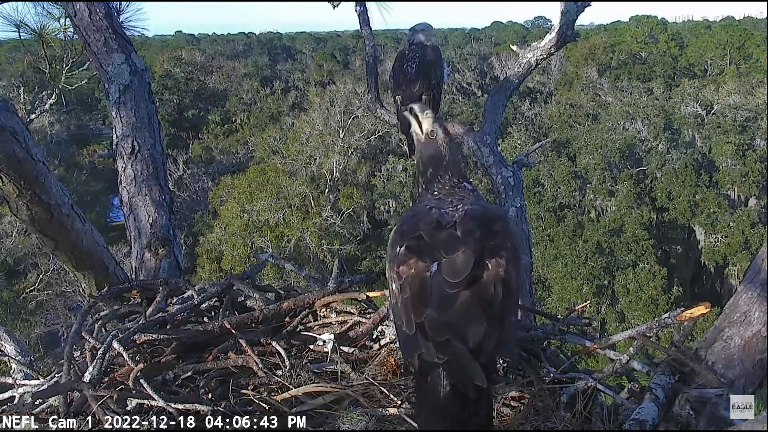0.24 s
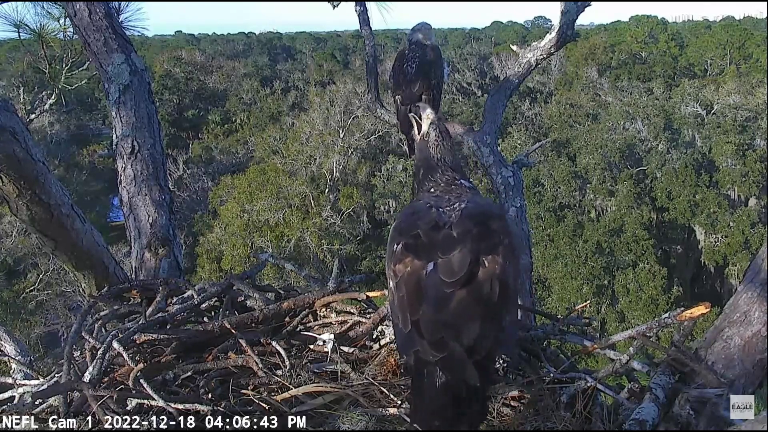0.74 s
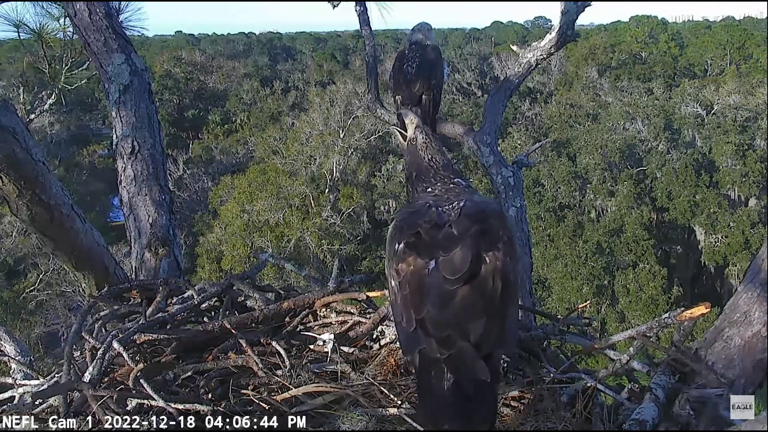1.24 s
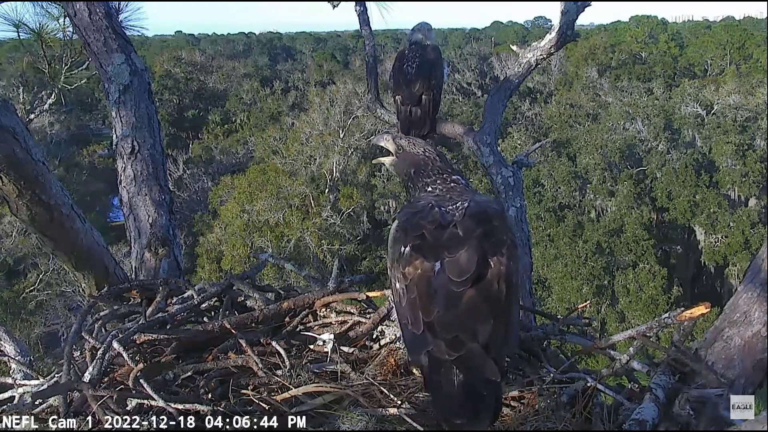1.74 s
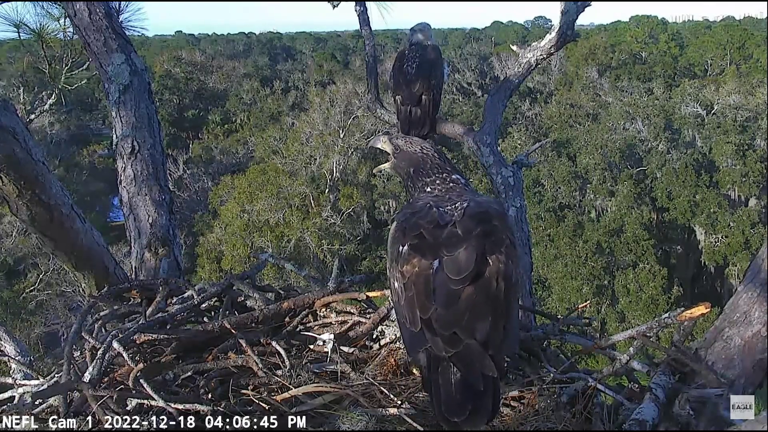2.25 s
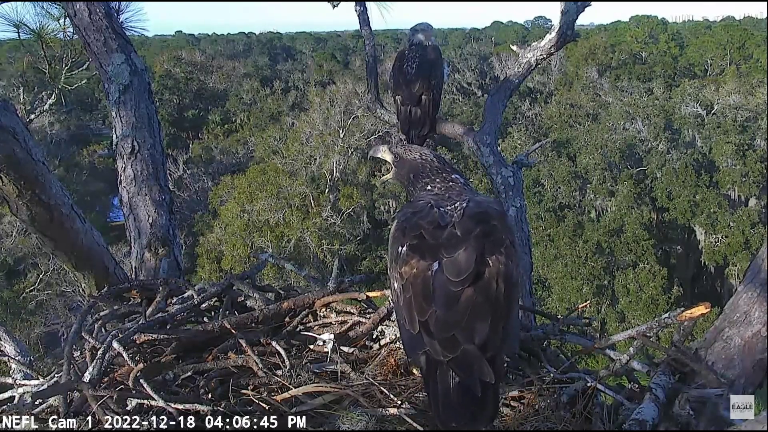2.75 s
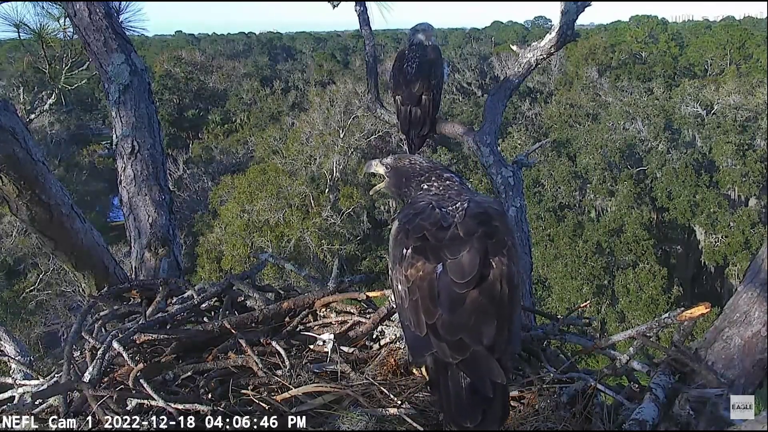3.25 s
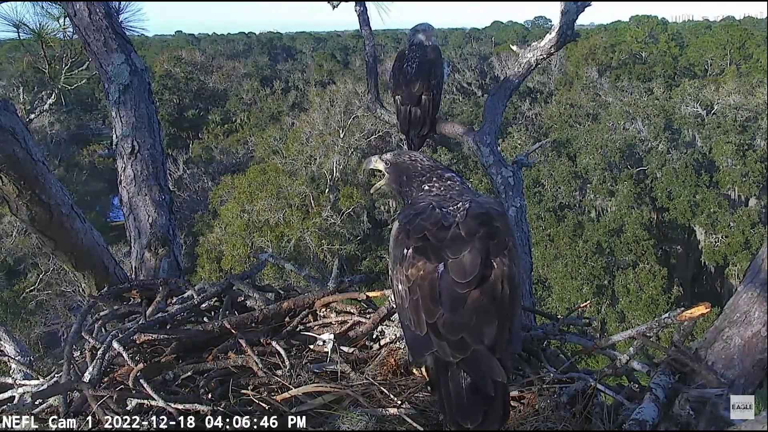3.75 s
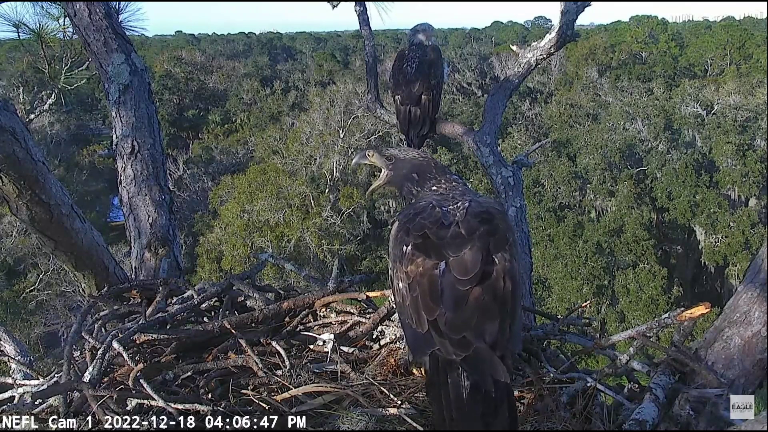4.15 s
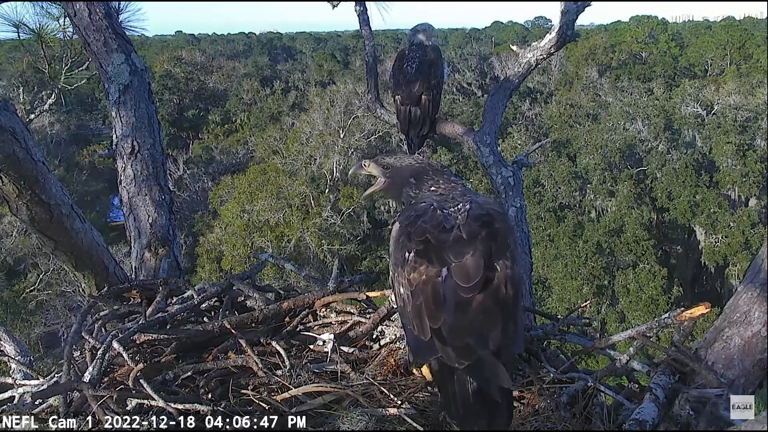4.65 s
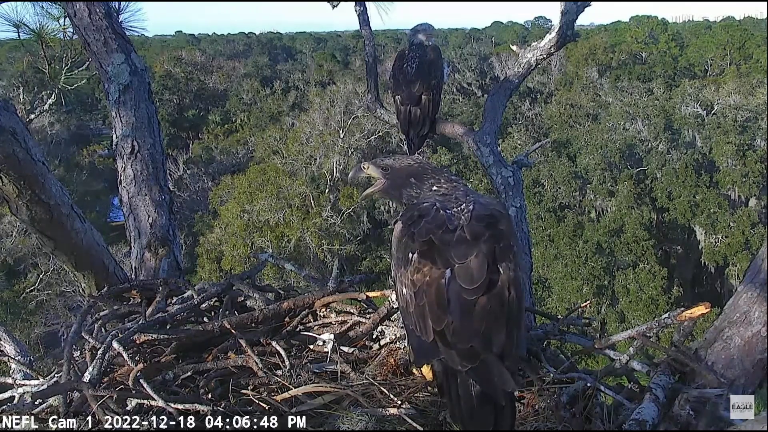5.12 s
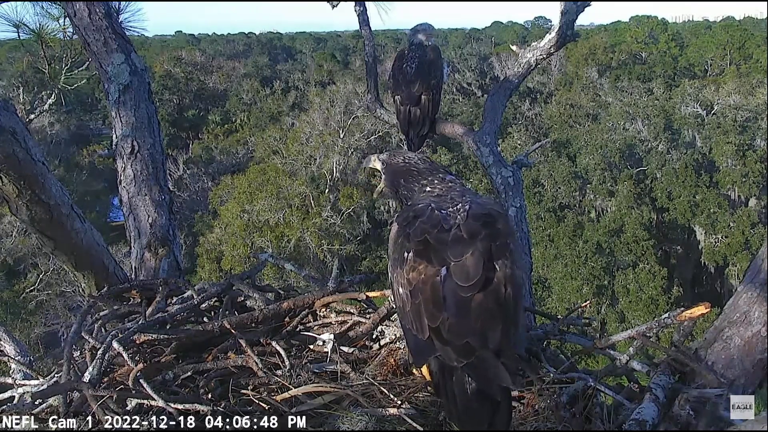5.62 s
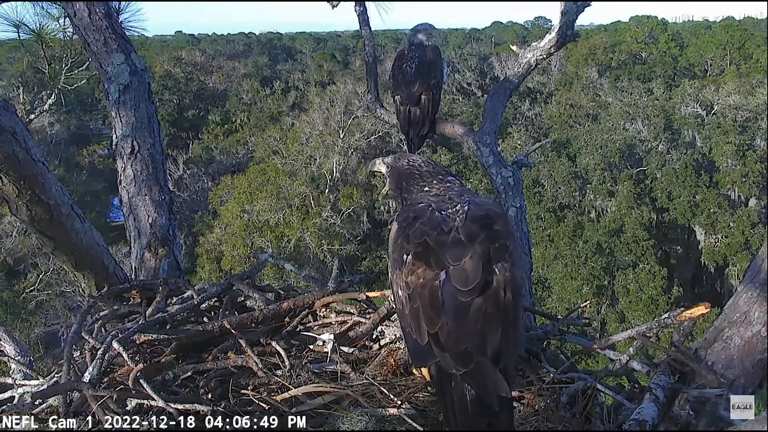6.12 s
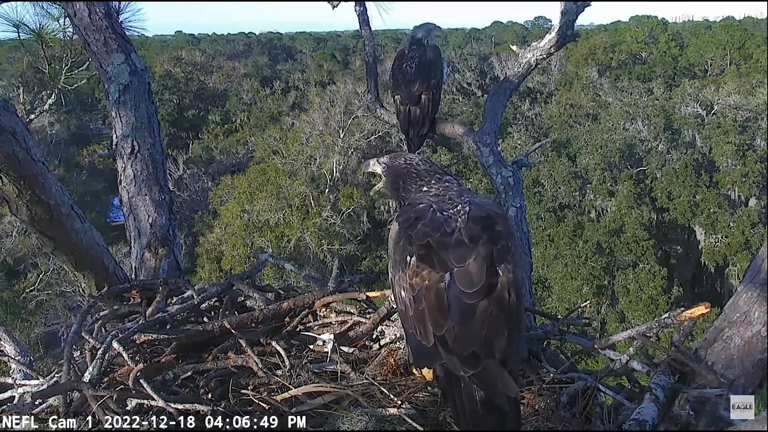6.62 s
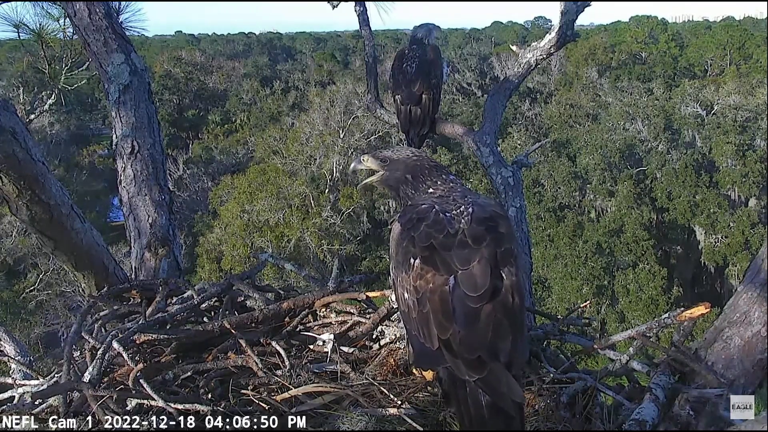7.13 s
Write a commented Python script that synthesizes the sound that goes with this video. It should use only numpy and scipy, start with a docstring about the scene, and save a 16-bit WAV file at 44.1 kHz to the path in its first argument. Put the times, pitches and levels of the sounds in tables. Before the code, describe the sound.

Quiet outdoor air opens the scene: soft distant wash, slight low wind, a faint far engine drone and barely audible thin electronic whines. From about 0.7 s a young eagle, close to the microphone, gives three high gliding peals, near 0.7, 1.1 and 1.6 s; each whistle flips to a higher note, then tumbles quickly through lower, rougher ones. After a pause, a run begins near 2.9 s: a short lead-in, three piercing arched yelps, then softer, lower chirps until 3.7 s. A louder, rougher run bursts in around 4.6 s, cracking and squeaking, and trails off by 5.4 s. The third starts near 6.2 s with three yelps, then descending chatter to a low cluck at 7.3 s. Loud notes sound slightly overloaded; short nest reflections and a faint forest tail follow them. The low engine drone swells and ebbs, rising a little at the end.

```python
'''A young bald eagle calls from its nest, close to the microphone; nest and forest throw it back.
Throughout: filtered noise for a distant wash and a little wind, a low engine drone, thin electronic whines.
From 0.7 s three drawn-out peals: gliding whistles that jump up a register, then collapse through lower ones.
From 2.9, 4.6 and 6.2 s three runs: loud arched yelps, some cracking, then shorter chatter that trails off.
Roughness shakes and buzzes the notes and adds rasp; the loud ones overload the microphone input.'''
import sys
import numpy as np
from scipy import signal
from scipy.fft import rfft, irfft
from scipy.io import wavfile

SR = 44100
rng = np.random.default_rng(int(sys.argv[2]) if len(sys.argv) > 2 else 0)


def generate_wav(sig):
    """Save sig (samples, or channels by samples) to the path in sys.argv[1] as 16-bit PCM at SR."""
    pcm = np.round(np.clip(np.atleast_2d(sig).T, -1, 1) * 32767).astype(np.int16)
    wavfile.write(sys.argv[1], SR, pcm)


N = 325458
TIME = np.arange(N) / SR


def amp(db):
    """Decibels to gain."""
    return 10 ** (np.asarray(db) / 20)


def unit(x):
    """Scales to rms 1."""
    return x / np.sqrt(np.mean(x ** 2) + 1e-20)


def curve(rows, t_s):
    """Interpolates (time_s, value) rows at t_s."""
    return np.interp(t_s, *np.transpose(rows))


def spectrum(rows, hz):
    """Interpolates (freq_hz, value) rows on a log-frequency axis."""
    row_hz, value = np.transpose(rows)
    return np.interp(np.log(hz + 1), np.log(row_hz + 1), value)


def noise(shape):
    """Noise of rms 1 whose spectrum is the gain function shape(hz)."""
    white = rfft(rng.standard_normal(N))
    return unit(irfft(white * shape(np.fft.rfftfreq(N, 1 / SR)), N))


def wobble(hz):
    """Random motion of rms 1, mostly slower than hz."""
    return noise(lambda f: 1 / (1 + (f / hz) ** 4))


def add(mix, start_s, sound):
    """Mixes a sound in at start_s."""
    part = mix[round(start_s * SR):][:len(sound)]
    part += sound[:len(part)]


def arch(u, start, middle, end):
    """Parabola through three values as u goes from 0 to 1."""
    ends = (2 * u - 1) * ((u - 1) * start + u * end)
    return ends + 4 * u * (1 - u) * middle


# Wash colour: freq_hz, relative_db per Hz
WASH_COLOUR = [(76, -51.5), (130, -12.5), (206, -3.5), (247, -6), (333, -7), (361, -10.5), (560, -6.5),
               (852, -1.5), (980, -2.5), (1380, -2), (2510, -25), (2670, -21), (7390, -31.5), (12900, -36),
               (15500, -76)]
# Wash humps and hollows: centre_hz, sigma_hz, gain_db
WASH_BANDS = [(805, 96, -1), (1030, 82, -9.5), (1460, 250, 2), (2320, 83, 2)]
# Wash level before the swell: time_s, rms_db
WASH_LEVEL = [(0, -49), (1, -47.5), (2.2, -46), (2.7, -47.5), (5.7, -47), (7.3, -46)]


def wash(swell_db=1.16, swell_hz=27):
    """Distant traffic and foliage: coloured noise with a random swell in level."""
    def colour(f):
        bands_db = sum(db * np.exp(-.5 * ((f - hz) / sigma_hz) ** 2) for hz, sigma_hz, db in WASH_BANDS)
        return amp(spectrum(WASH_COLOUR, f) + bands_db)
    level_db = curve(WASH_LEVEL, TIME) + swell_db * wobble(swell_hz)
    return noise(colour) * amp(level_db)


# Wind on the microphone: time_s, rms_db
WIND_LEVEL = [(0, -46.5), (.65, -43.5), (.95, -51), (1.17, -46), (1.4, -52.5), (7.3, -48.5)]


def wind(corner_hz=48):
    """Soft buffeting: low-passed noise under a level curve."""
    return amp(curve(WIND_LEVEL, TIME)) * noise(lambda f: 1 / (1 + (f / corner_hz) ** 2))


# Steady electronic whines: centre_hz, half_width_hz, rms_db
WHINES = [(2650, 8, -72.5), (12958, 50, -80)]


def whine():
    """Faint thin whistles of the electronics: very narrow bands of noise."""
    return sum(amp(db) * noise(lambda f: 1 / (1 + ((f - hz) / half_width_hz) ** 4))
               for hz, half_width_hz, db in WHINES)


# Engine gain ahead of the line and blur levels: time_s, gain_db
DRONE_GAIN = [(0, -49.5), (1.1, -48.5), (1.46, -38.5), (1.64, -48.5), (1.83, -41.5), (2.2, -44),
              (2.55, -47), (3.6, -50), (4.02, -41.5), (4.5, -46), (5.5, -49.5), (5.9, -42.5), (6.25, -46),
              (7.3, -43)]
# Engine firing rate: time_s, rate_hz
DRONE_RATE = [(0, 103), (.7, 103.5), (1.35, 102.4), (1.54, 99.05), (3, 99), (4.8, 96.94), (7.3, 97.95)]


def drone(line_db=-3.5, blur_hz=106, half_width_hz=12, blur_db=-9):
    """A far engine: one wavering firing line in a narrow band of rumble."""
    phase = 2 * np.pi * np.cumsum(curve(DRONE_RATE, TIME)) / SR
    line = np.sqrt(2) * np.sin(phase)
    blur = noise(lambda f: 1 / (1 + ((f - blur_hz) / half_width_hz) ** 2))
    return amp(curve(DRONE_GAIN, TIME)) * (amp(line_db) * line + amp(blur_db) * blur)


def tail(t60_rows, rise_s):
    """Diffuse echo of energy 1: noise whose bands each die at their own speed."""
    hz, t, z = signal.stft(rng.standard_normal(2 * SR), SR, nperseg=256)
    decay = np.exp(-np.log(1000) * t / spectrum(t60_rows, hz)[:, None])
    rise = 1 - np.exp(-t / rise_s)
    response = signal.istft(z * decay * rise, SR, nperseg=256)[1]
    return response / np.linalg.norm(response)


# Echoes off nest and limbs: delay_s, gain_db
ECHOES = [(.0052, -28), (.0098, -18), (.014, -19), (.02, -25), (.027, -37)]
# Forest reverberation: freq_hz, t60_s
FOREST = [(500, 1.4), (1500, 2.5), (3700, 1.2), (5000, 0.39), (8000, 1.2), (14000, .25)]


def surroundings(call, crown_db=-27, forest_db=-34):
    """Single echoes off nest and limbs, a short scatter in the crown, a faint long tail from the forest."""
    out = np.zeros(N)
    for delay_s, db in ECHOES:
        add(out, delay_s, amp(db) * call)
    crown = amp(crown_db) * tail([(1500, .13), (5000, .14), (12000, 0.16)], rise_s=0.0076)
    forest = amp(forest_db) * tail(FOREST, rise_s=0.021)
    return out + signal.fftconvolve(call, crown + forest)[:N]


def puffs(lead_s=0.0023, puff_s=0.013, puff_hz=1300, puff_width_hz=500, puff_db=-30,
          chatter_lead_s=.012, chatter_hz=1600, chatter_db=-35,
          rasp_delay_s=.026, rasp_s=0.046, rasp_hz=3700, rasp_width_hz=700, rasp_db=-35):
    """Air escapes around each yelp and chatter onset and in each collapse: (centre, length, Hz, width, dB)."""
    at_yelps = [(start_s - lead_s, puff_s, puff_hz, puff_width_hz, level_db + puff_db)
                for start_s, _, _, _, _, level_db, *_ in YELPS]
    at_chatter = [(start_s - chatter_lead_s, puff_s, chatter_hz, puff_width_hz, level_db + chatter_db)
                  for start_s, _, _, _, level_db, *_ in CHATTER]
    at_collapses = [(collapse_s + rasp_delay_s, rasp_s, rasp_hz, rasp_width_hz, rasp_db)
                    for *_, collapse_s, _ in PEALS]
    return at_yelps + at_chatter + at_collapses


def squeaks():
    """Short swells of air through one resonance, without a steady whistle."""
    out = np.zeros(N)
    for centre_s, length_s, hz, half_width_hz, db in puffs():
        size = max(round(length_s * SR), 16)
        f = np.fft.rfftfreq(size, 1 / SR)
        resonance = 1 / (1 + ((f - hz) / half_width_hz) ** 4)
        air = unit(irfft(rfft(rng.standard_normal(size)) * resonance, size))
        add(out, centre_s - length_s / 2, amp(db) * air * np.hanning(size))
    return out


# Note shapes about the middle: start_ratio, end_ratio, start_db, end_db, octave_db
SCOOP = (.78, 1.08, -2, -5, -25)
LOW = (1, 1, -4.5, -10.5, -12)
SQUEAK = (1.07, .88, -14, -8, -29)
# Middle pitch of the scoop as a share of its note's pitch
CHATTER_SCOOP, YELP_SCOOP, PEAL_SCOOP = .88, .72, .65
# Roughness, 0-1
SCOOP_ROUGH, LOW_ROUGH, UPPER_ROUGH, SQUEAK_ROUGH, SLIP_ROUGH = .42, .18, 0.044, .25, .17


def note(start_s, length_s, hz, db, rough, shape):
    """One note in one register: (start, length, three pitches, three levels, octave overtone, roughness)."""
    first, last, first_db, last_db, octave_db = shape
    pitches_hz = hz * first, hz, hz * last
    levels_db = db + first_db, db, db + last_db
    return start_s, length_s, *pitches_hz, *levels_db, octave_db, rough


# Peals: start_s, scoop_s, scoop_db, whistle_s, pitch_hz, rise_share, level_db, start_level_db, end_level_db,
# roughness (0-1), low_register_db, upper_start_s, upper_length_s, upper_pitch_hz, upper_bow_share, upper_level_db,
# upper_octave_db, collapse_stretch (ratio), collapse_s, collapse_level_db
PEALS = [(.666, 0.029, -17.5, 0.11, 2923, .026, -11.5, -8, -24, 0.02, -32, 0.81, 0.023, 3820, .005, -17, -32, 1.12, 0.79, -22),
         (1.116, .007, -23.5, 0.072, 2942, .085, -8, -20.5, -20.5, 0.05, -21, 1.195, .058, 3595, 0.039, -18.5, -22.5, 0.83, 1.251, -22),
         (1.639, .011, -22.5, .05, 2940, .08, -10, -10, -17.5, .08, -17, 1.694, .066, 3784, 0, -12, -14, 1.0, 1.775, -22.5)]
# Collapse steps: delay_s before the stretch, length_s, pitch_hz, level_db re collapse level, sag_share,
# roughness (0-1)
COLLAPSE = [(0, 0.024, 4750, -3, .01, .06), (0.01, .016, 3875, 0, .02, .2), (.027, .017, 2866, 4, .13, .4),
            (.048, .013, 1460, -0.5, 0.027, 0.5)]


def peals(low_s=0.019, low_hz=1250, octave_db=-19, upper_in_db=-4, upper_out_db=-10,
          step_in_db=-8, step_out_db=-11, step_octave_db=-32):
    """A peal scoops out of the low register, climbs as a whistle, breaks to an upper note, then tumbles down."""
    for row in PEALS:
        start_s, scoop_s, scoop_db, whistle_s, hz, rise, db, first_db, last_db, rough, low_db, *ending = row
        upper_at_s, upper_s, upper_hz, bow, upper_db, upper_octave_db, stretch, collapse_s, collapse_db = ending
        climb = (1 - rise, 1 + rise, first_db - db, last_db - db, octave_db)
        bowed = (1 + bow, 1 + bow, upper_in_db, upper_out_db, upper_octave_db)
        yield note(start_s, low_s, low_hz, low_db, LOW_ROUGH, LOW)
        yield note(start_s, scoop_s, PEAL_SCOOP * hz, scoop_db, SCOOP_ROUGH, SCOOP)
        yield note(start_s + scoop_s, whistle_s, hz, db, rough, climb)
        yield note(upper_at_s, upper_s, upper_hz, upper_db, UPPER_ROUGH, bowed)
        for delay_s, length_s, step_hz, step_db, sag, step_rough in COLLAPSE:
            shape = (1 + sag, 1 - sag, step_in_db, step_out_db, step_octave_db)
            step_s = collapse_s + stretch * delay_s
            yield note(step_s, length_s, step_hz, collapse_db + step_db, step_rough, shape)


# Yelps: start_s, length_s, pitch_hz, rise_share, fall_share, level_db, fade_db, roughness (0-1), octave_db,
# scoop_db, squeak_db
YELPS = [(3.02, .088, 3341, .08, .14, -5.5, -9.5, 0.03, -13.5, -32, -41.5),
         (3.146, .05, 3296, .07, .06, -7, -6, 0.09, -14, -32, -21.5),
         (3.272, .038, 3192, 0.045, 0.067, -2, -7.5, 0.02, -16.5, -20.5, -27.5),
         (4.596, 0.024, 3120, .01, .03, -2, -5, .08, -20, -14.5, -28),
         (4.659, 0.071, 3458, 0.068, .14, 0, -2.5, 0.01, -26, -11, -30),
         (4.783, .059, 3393, .08, 0.1, -3, -2.5, 0.1, -19, -7.5, -17.5),
         (4.916, .037, 3246, .04, .055, -0.5, -3, .07, -25, -10.5, -25),
         (6.28, 0.063, 3322, .065, .08, -3, -4, .01, -15.5, -35, -26),
         (6.392, .06, 3335, 0.068, 0.09, -3.5, -6.5, .08, -18, -24, -20),
         (6.521, 0.0453, 3207, 0.033, .06, -2, -7.5, 0.05, -22.5, -10.5, -25.5)]


def yelps(squeak_hz=5700, squeak_s=.0085, squeak_lead_s=.0095, scoop_s=.005, first_db=-4):
    """A yelp starts with a thin squeak and a scoop, then arches; the arch falls silent while the voice cracks."""
    for start_s, length_s, hz, rise, fall, db, fade_db, rough, octave_db, scoop_db, squeak_db in YELPS:
        yield note(start_s - squeak_lead_s, squeak_s, squeak_hz, squeak_db, SQUEAK_ROUGH, SQUEAK)
        yield note(start_s - scoop_s, scoop_s, YELP_SCOOP * hz, scoop_db, SCOOP_ROUGH, SCOOP)
        stop_s = start_s + length_s
        breaks = [(s, s + crack_s) for s, crack_s, *_ in CRACKS if start_s < s < stop_s]
        spans = [(start_s, stop_s)]
        if breaks:
            spans = [(start_s, breaks[0][0]), (breaks[-1][1], stop_s)]
        for begin_s, end_s in spans:
            if end_s > begin_s:
                u = (np.linspace(begin_s, end_s, 3) - start_s) / length_s
                pitches_hz = arch(u, hz * (1 - rise), hz, hz * (1 - fall))
                levels_db = arch(u, db + first_db, db, db + fade_db)
                yield (begin_s, end_s - begin_s, *pitches_hz, *levels_db, octave_db, rough)


# Cracks to a higher register: start_s, length_s, pitch_hz, level_db, roughness (0-1)
CRACKS = [(3.064, .006, 3430, -20.5, 0.14), (3.163, 0.0062, 4300, -23, .4), (4.665, .047, 5020, -18, 0.77),
          (4.799, .013, 4320, -7, 0.16), (5.165, .007, 3146, -11, 0.08), (6.408, 0.016, 4630, -26.5, 1),
          (6.423, .012, 4170, -11.5, 0.07), (6.786, 0.0094, 3140, -19.5, 0.26)]


def cracks(swoop=0.26, edge_db=-4, octave_db=-23):
    """The rougher a crack, the wider its pitch swoops up and back."""
    for start_s, length_s, hz, db, rough in CRACKS:
        ends = 1 - swoop * rough
        yield note(start_s, length_s, hz, db, rough, (ends, ends, edge_db, edge_db, octave_db))


# Chatter: start_s, length_s, pitch_hz, sag_share, level_db, roughness (0-1), octave_db, scoop_s, scoop_db
CHATTER = [(2.951, .034, 2360, 0.028, -12.5, 0.11, -19, 0.0042, -26),
           (3.397, 0.032, 2284, 0.069, -11, 0.06, -18, 0.0086, -14.5),
           (3.523, 0.013, 2154, 0.046, -10.5, 0, -25, 0.0091, -15.5),
           (3.637, 0.016, 2085, 0.057, -16, 0.07, -22, 0.007, -21.5),
           (4.582, 0.019, 2386, -0.044, -4.5, .21, -17, 0.0033, -16.5),
           (4.954, 0.014, 2270, 0.049, -7.5, 0.1, -21, 0.0031, -28),
           (5.046, 0.033, 2439, 0.039, -4, 0.07, -9, 0.0082, -6.5),
           (5.169, 0.031, 2336, 0.038, -5.5, 0.06, -14, 0.0038, -20.5),
           (5.29, 0.013, 2200, 0.045, -5, 0.14, -22, .007, -15.5),
           (6.656, 0.038, 2440, .05, -9, 0.23, -14.5, .009, -11),
           (6.795, 0.034, 2276, 0.092, -11.5, 0.1, -13.5, 0.014, -13.5),
           (6.921, 0.038, 2206, 0.063, -11, .03, -19, 0.0068, -13),
           (7.062, 0.021, 2122, 0.066, -15, 0.1, -21.5, .011, -13),
           (7.196, 0.014, 2030, 0.08, -13, 0.31, -23.5, 0.0058, -18.5)]


def chatter(first_db=-4, fade_db=-10, last_ratio=0.98):
    """Each note scoops up roughly, then glides to its pitch, mostly from above, and fades."""
    for start_s, length_s, hz, sag, db, rough, octave_db, scoop_s, scoop_db in CHATTER:
        yield note(start_s - scoop_s, scoop_s, CHATTER_SCOOP * hz, scoop_db, SCOOP_ROUGH, SCOOP)
        yield note(start_s, length_s, hz, db, rough, (1 + sag, last_ratio, first_db, fade_db, octave_db))


# Clucks in the lowest register: start_s, length_s, pitch_hz, level_db
CLUCKS = [(2.93, 0.0079, 1470, -27.5), (4.575, .013, 1480, -8), (5.393, 0.01, 1613, -31),
          (6.168, 0.011, 1317, -17), (7.334, .018, 1289, -11.5)]
# Thin glides as the voice slips: start_s, length_s, start_hz, middle_hz, end_hz, level_db, octave_db
SLIPS = [(2.997, 0.02, 3260, 3510, 3760, -30.5, 0), (3.113, 0.023, 5400, 6900, 7000, -36, -30),
         (4.615, 0.054, 3620, 7850, 6300, -18, -32), (6.188, 0.016, 5900, 5490, 5000, -44, -30),
         (6.238, 0.023, 3210, 3220, 3250, -36, 4.5), (6.266, .009, 3060, 3000, 3060, -13.5, -10.5),
         (6.271, 0.012, 6220, 6200, 6000, -22, -28.5)]


def notes(slip_edge_db=-7):
    """All that the syrinx sings: peals, yelps, cracks, chatter, clucks and slips."""
    clucks = [note(*row, LOW_ROUGH, LOW) for row in CLUCKS]
    slips = [(*glide, db + slip_edge_db, db, db + slip_edge_db, octave_db, SLIP_ROUGH)
             for *glide, db, octave_db in SLIPS]
    return [*peals(), *yelps(), *cracks(), *chatter(), *clucks, *slips]


# Brief dips in level within a note, as echoes cancel the gliding whistle: time_s, width_s, gain_db
DIPS = [(1.144, .002, -18), (1.176, .006, -10), (1.674, .004, -15), (2.972, .005, -12), (3.187, .002, -12),
        (3.402, .004, -6), (6.556, .002, -9)]


def dips():
    """Gain curve: 1, with a short Gaussian dip in level at each row."""
    return amp(sum(db * np.exp(-((TIME - s) / width_s) ** 2) for s, width_s, db in DIPS))


# Half-pitch lines, as strong and weak cycles alternate: time_s, level_db
HALF_LINES = [(.7, -26.5), (1.2, -26), (1.7, -36), (3, -47)]
# Overtones 3-5 of loud notes, by where they fall in the throat: freq_hz, level_db
THROAT = [(3900, -28.5), (5400, -42.5), (7000, -18), (7800, -35), (9000, -33.5), (11800, -45.5),
          (15000, -74.5)]
# Rasp colour: freq_hz, relative_db
RASP = [(150, -15), (800, -10.5), (1500, 6.5), (3000, 6), (4500, -4), (7000, -6), (10000, -20.5),
        (14000, -34.5)]


def eagle(edge_s=0.0045, rough_edge_s=.004, waver=0.0019, grain=0.0015, jitter=0.15, shimmer=0.42,
          buzz_hz=340, buzz_depth=0.39, flutter_db=1.26, split_ratio=1.3, split_db=-4, rasp_db=-14, air_db=-38,
          full_db=-9, brightening_db_per_db=0.73, smear_rad=0.39, patchy_db=2.0):
    """The syrinx whistles a near sine; roughness shakes and buzzes it, sounds its second side and adds rasp."""
    out = np.zeros(N)
    slow, shake, throb = wobble(hz=169.9), wobble(hz=680), wobble(hz=520)
    flutter, stutter = wobble(hz=69), wobble(hz=294)
    buzz = np.sin(2 * np.pi * np.cumsum(buzz_hz * (1 + 0.21 * slow)) / SR)
    chop = shimmer * throb + buzz_depth * buzz
    # overtones are less steady than the whistle
    smear = smear_rad * wobble(hz=212)
    patches = amp(patchy_db * wobble(hz=90))
    air = noise(lambda f: amp(spectrum(RASP, f)))
    for start_s, length_s, *pitches_hz, db_start, db_middle, db_end, octave_db, rough in notes():
        edge = edge_s + rough_edge_s * rough  # rough notes catch and let go more slowly
        first = round((start_s - edge / 2) * SR)
        last = min(N, round((start_s + length_s + edge / 2) * SR))
        i = np.arange(first, last)
        t = TIME[i] - start_s
        u = np.clip(t / length_s, 0, 1)
        db = arch(u, db_start, db_middle, db_end) + flutter_db * flutter[i]
        hz = arch(u, *pitches_hz) * (1 + waver * slow[i] + (grain + jitter * rough) * shake[i])
        phase = 2 * np.pi * np.cumsum(hz) / SR

        bright = amp(brightening_db_per_db * np.minimum(db - full_db, 0))  # soft notes are purer
        octave = amp(octave_db) * np.sin(2 * phase + smear[i])
        upper = sum(amp(spectrum(THROAT, k * hz)) * np.cos(k * phase + smear[i]) for k in range(3, 6))
        halves = amp(curve(HALF_LINES, start_s)) * (np.sin(phase / 2) + 0.4 * np.sin(phase + phase / 2))
        voice = np.sin(phase) + patches[i] * (octave + bright * upper + halves)
        chopped = voice * (1 + np.tanh(rough * chop[i]))

        second_side = amp(split_db) * rough * stutter[i] * np.sin(split_ratio * phase)
        hiss = bright * (amp(air_db) + amp(rasp_db) * rough) * air[i]
        ramp = np.clip(np.minimum(t, length_s - t) / edge + .5, 0, 1)
        gate = np.sin(np.pi / 2 * ramp) ** 2
        out[i] += gate * amp(db) * (chopped + second_side + hiss)
    return out


def scene():
    """The eagle, its echoes and the background."""
    call = eagle() * dips() + squeaks()
    background = wash() + drone() + wind() + whine()
    return (call + surroundings(call) + background)[None]


# Overall tone, dull above 13 kHz: freq_hz, gain_db
TREBLE_ROLL_OFF = [(20, 3), (10000, -1), (13000, -1), (14500, -9), (16000, -5)]
EDGE_HZ = 16100


def record(dry, ceiling=0.5, lopsided=0.0069, drift=0.027, drift_hz=110, knee=17.0):
    """The input flattens the loud notes; its shifting, lopsided limit leaves low thumps under them."""
    fine = signal.resample_poly(dry, 4, 1, axis=1)  # clip at 4x rate against aliasing
    bias = lopsided + drift * noise(lambda f: 1 / np.hypot(1, f / drift_hz))
    limit = ceiling * (1 + np.repeat(bias, 4) * np.sign(fine))
    clipped = fine / (1 + abs(fine / limit) ** knee) ** (1 / knee)
    out = signal.resample_poly(clipped, 1, 4, axis=1)
    tone = amp(spectrum(TREBLE_ROLL_OFF, np.fft.rfftfreq(N, 1 / SR)))
    out = irfft(rfft(out) * tone, N)
    lowpass = signal.firwin(511, EDGE_HZ, window=("kaiser", 9), fs=SR)
    return signal.oaconvolve(out, lowpass[None], "same")


dry = scene()
out = record(dry)
generate_wav(out)
```